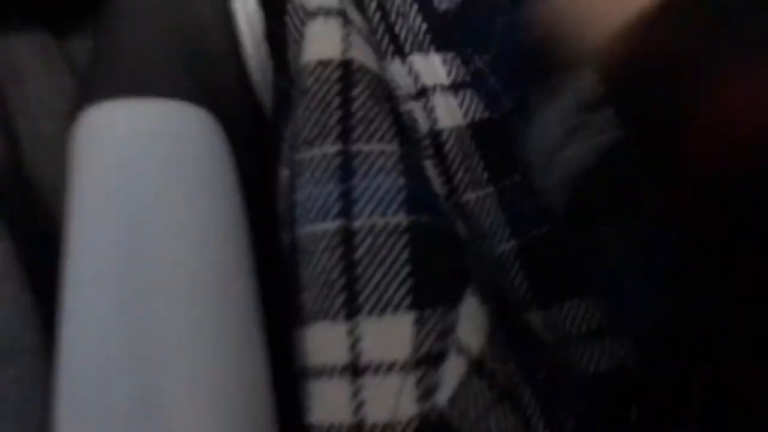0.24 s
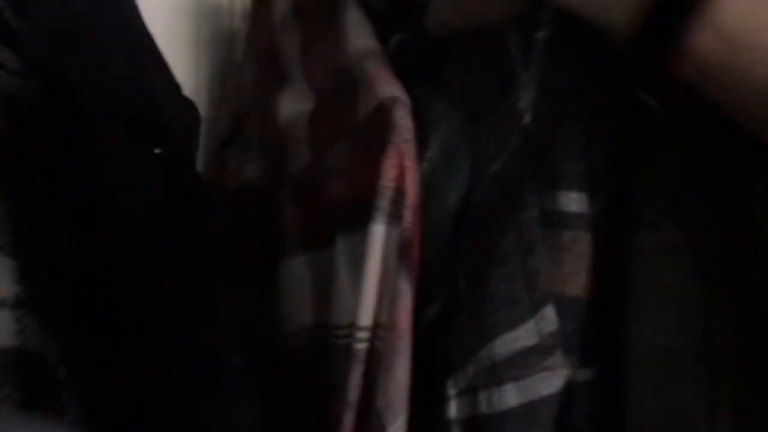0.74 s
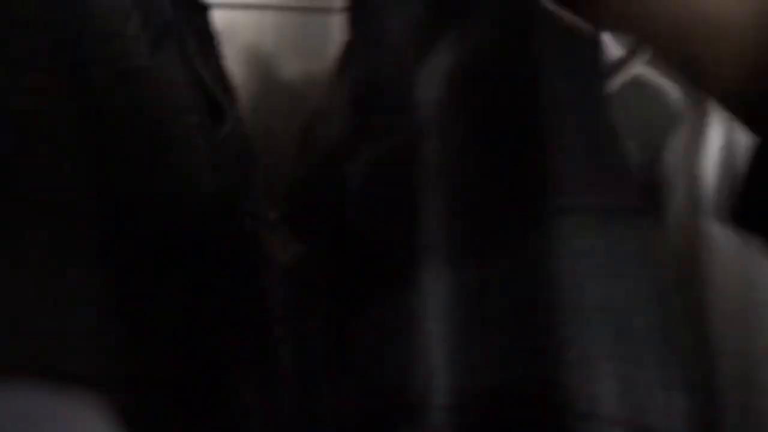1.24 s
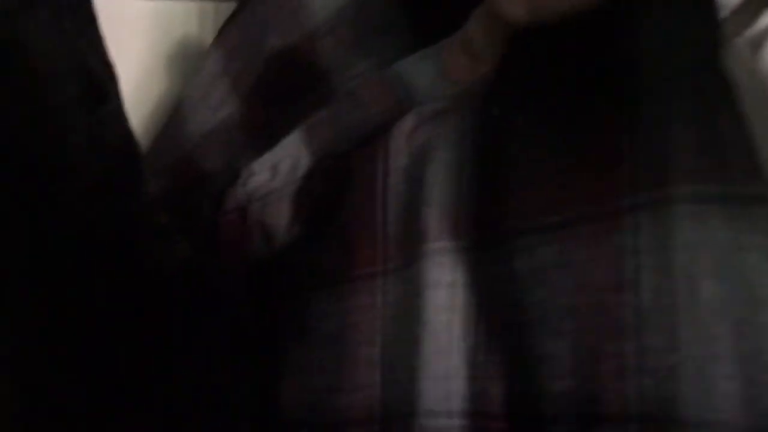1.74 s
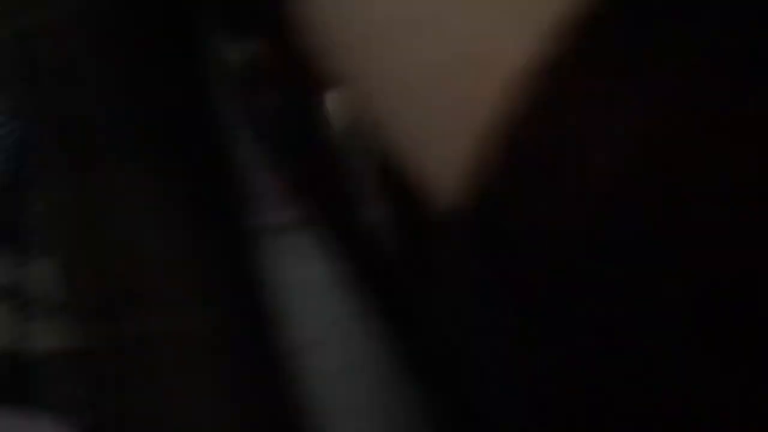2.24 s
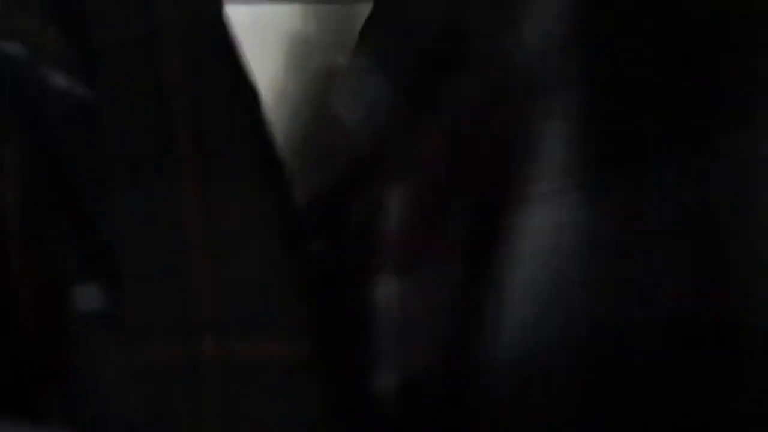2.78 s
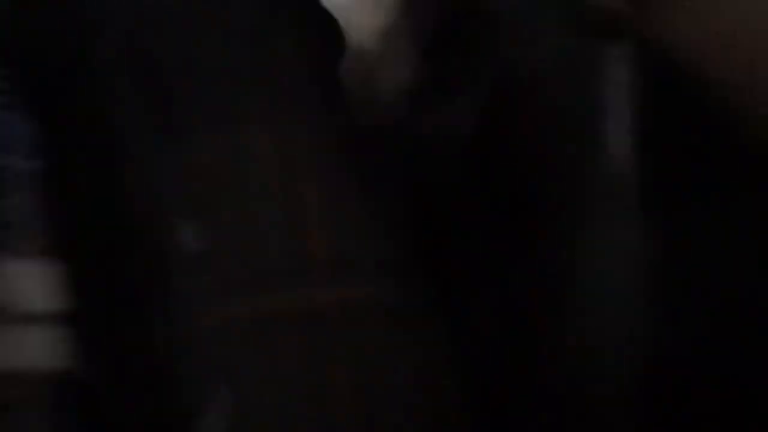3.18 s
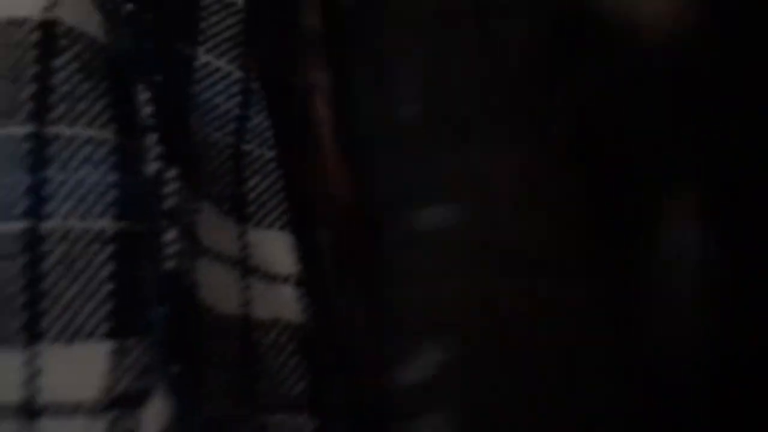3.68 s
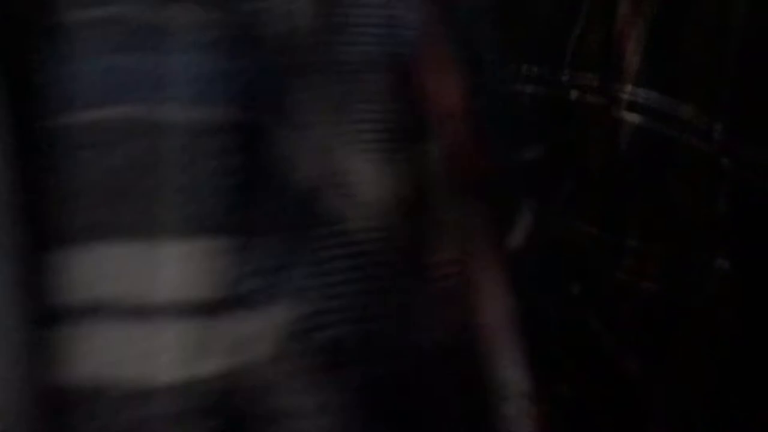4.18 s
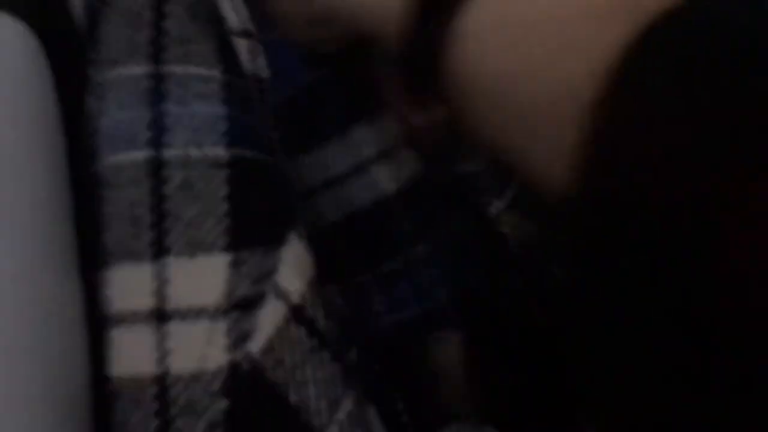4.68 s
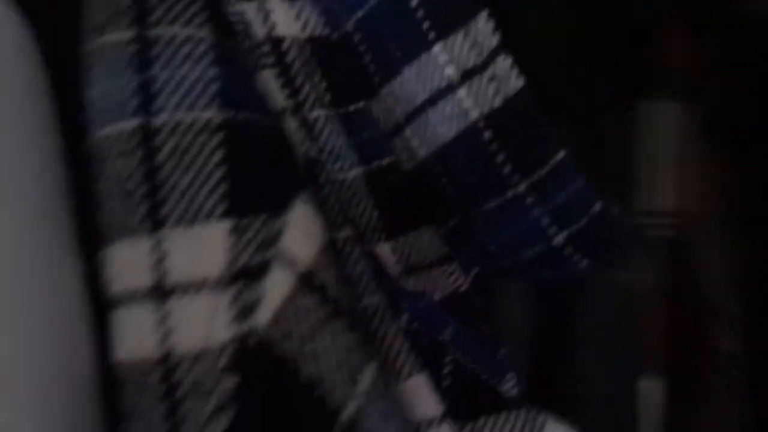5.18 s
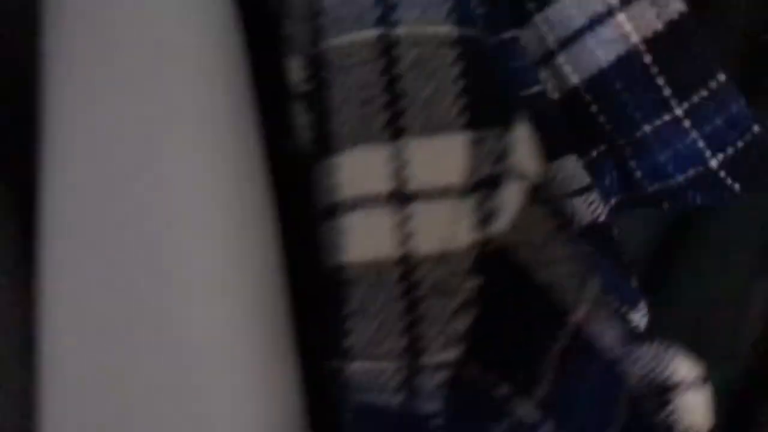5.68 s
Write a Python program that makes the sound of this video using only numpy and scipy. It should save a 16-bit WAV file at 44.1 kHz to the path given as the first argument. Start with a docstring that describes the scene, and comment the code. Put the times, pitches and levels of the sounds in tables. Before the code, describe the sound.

Shirts are pushed along a closet rail, heard up close. Each push is a brief, gritty, ringing metal scrape of hanger hooks, often with sharp clicks. The first comes at about 0.2 seconds and another at 0.9, each with a bright click. A softer slide and a light wooden knock follow around 1.4. After a lull, hooks scrape and tick at 2.1. The loudest clatter comes at 2.7, ending in a knock of a hanger on wood. Another sharp clack and a lighter knock land near 3.8. More scrapes and clicking chatters follow at 4.7, 5.2 and 5.6, with a last click near 5.9. A few very faint hanger squeaks slip in between. Throughout, the shirts rustle softly and make dull bumps and low surges of air as they swing, over quiet room rumble and microphone hiss.

```python
"""Hanger hooks scrape along a closet rail as a hand pushes shirts aside. Each hook sticks and slips,
which makes the rail ring, and hooks click against each other in short chatters. Hanger bodies knock on
the closet wood and now and then squeak. The shirts rustle, bump softly and pump the closet's air into
a low boom. Under it all lie room rumble and microphone hiss."""
import sys
import numpy as np
from scipy import signal
from scipy.fft import rfft, irfft, next_fast_len
from scipy.io import wavfile
from scipy.ndimage import uniform_filter1d, map_coordinates

SR = 44100
rng = np.random.default_rng(int(sys.argv[2]) if len(sys.argv) > 2 else 0)


def unload_audio(sound):
    """Save the sound as a 16-bit wav file, at the path given as the first command line argument."""
    columns = np.transpose(np.atleast_2d(sound))
    # keep every value between -1 and 1, then stretch to whole-number steps
    steps = np.round(np.clip(columns, -1, 1) * 32767)
    wavfile.write(sys.argv[1], SR, steps.astype(np.int16))


N = 261063

# Hanger bodies hitting wood. Each row: start in seconds, level in dB, favoured note in Hz.
WOOD_KNOCKS = [(0.16, -45, 318), (1.303, -43.5, 326), (1.412, -32.5, 369), (1.639, -51, 285),
               (2.004, -48, 288), (2.7648, -24.5, 697), (2.907, -46, 260), (3.068, -40.5, 277),
               (3.101, -44.5, 460), (3.814, -30.5, 355), (3.95, -52, 250), (3.972, -42, 250),
               (4.099, -40.5, 269), (4.425, -53, 288), (4.853, -41, 380), (4.956, -48, 250)]
# One list for each push along the rail. Each row: time in seconds, scrape level in dB, brightness in dB.
RAIL_PUSHES = [
    [(0.13, -73, -1), (0.155, -64, 5), (0.17, -47, 4.5), (0.202, -58.5, -3.5), (0.21, -48, 8.5),
     (0.23, -61, 4), (0.234, -48.5, 4), (0.3, -77, -4)],
    [(0.41, -81, 6), (0.434, -65, -1.5), (0.46, -73, -5)],
    [(0.8, -69, -1), (0.818, -57.5, -4), (0.868, -51, -1.5), (0.882, -62.5, 6), (0.892, -49, -2.5),
     (0.95, -55, -1), (0.958, -50.5, -5.5), (1.018, -58, 3), (1.045, -69, 2), (1.13, -86, 13)],
    [(1.26, -62, -1.5), (1.262, -76, -1), (1.298, -72, 8.5), (1.304, -54, -5), (1.352, -87, 12),
     (1.362, -77, 8), (1.374, -64, -0.5), (1.394, -83, 7.5), (1.4, -79, -1.5)],
    [(2.0, -68, -12.5), (2.024, -67, 6), (2.038, -51, 7), (2.102, -60, 4.5), (2.128, -54, 2),
     (2.152, -60, -2), (2.162, -47, -3), (2.176, -66, 2), (2.23, -76, 0)],
    [(2.61, -76, 5), (2.638, -49, -1), (2.653, -59, -7)],
    [(2.655, -56, -6), (2.661, -48.5, 8.5), (2.691, -43, 2.5), (2.735, -68, 4), (2.749, -48.5, 4),
     (2.755, -60, 1)],
    [(2.757, -61, 8), (2.765, -48.5, -2), (2.787, -62, -0.5), (2.843, -75, -0.5), (2.853, -55, -26),
     (2.87, -90, -3)],
    [(3.06, -103, 4), (3.068, -78, -7), (3.074, -54.5, -14.5), (3.086, -79, -10), (3.114, -76, 10),
     (3.124, -90.5, 16.5), (3.15, -88, 12)],
    [(3.63, -82, 1), (3.656, -63.5, -2), (3.664, -60.5, 2.5), (3.708, -51.5, 6), (3.76, -54.5, 10),
     (3.79, -74, 0)],
    [(3.795, -64, 5), (3.801, -60, -4), (3.817, -53, -1.5), (3.831, -59, -1.5), (3.837, -68, 6),
     (3.867, -64.5, 2.5), (3.877, -73, 3.5), (3.89, -73, 1)],
    [(3.95, -78, -6), (3.962, -90, -3), (3.972, -61, -7), (3.982, -83, 16), (4.05, -71.5, 0.5),
     (4.074, -52, -6), (4.132, -86.5, 13), (4.19, -74.5, 6)],
    [(4.41, -90.5, -5), (4.418, -85, -10), (4.422, -70, 7), (4.426, -52, -23), (4.434, -66.5, -5),
     (4.46, -56.5, -17.5), (4.47, -70.5, -6.5)],
    [(4.67, -63, -1.5), (4.68, -89.5, -7), (4.69, -67, 4), (4.708, -48, -3.5), (4.77, -54, -2),
     (4.774, -52, -9), (4.812, -64, -6), (4.818, -55.5, -10), (4.88, -73, -4)],
    [(5.11, -71, -6), (5.13, -66.5, 0.5), (5.166, -48, -1.5), (5.212, -59.5, -1.5), (5.218, -50, -4),
     (5.268, -49.5, -0.5), (5.29, -72.5, 8), (5.34, -82, 3)],
    [(5.57, -68, -17), (5.582, -67, 1), (5.596, -47.5, 0.5), (5.658, -58, -4), (5.68, -95, -7),
     (5.69, -102, 2)],
    [(5.86, -70, 3), (5.884, -74, -1), (5.894, -58, -6), (5.92, -62, -5)],
]


def amp(db):
    """Turn decibels into a gain."""
    return 10 ** (np.asarray(db) / 20)


def unit(x):
    """Scale a signal to an average (rms) size of 1."""
    return x / np.sqrt(np.mean(x ** 2) + 1e-20)


def shape(points):
    """A tone colour: gain for any pitch, drawn through (Hz, dB) points."""
    point_hz, db = np.transpose(points)
    return lambda hz: amp(np.interp(np.log(hz + 1), np.log(point_hz + 1), db))


def modes(table, hz):
    """The joint response of resonances, each given as pitch in Hz, width in Hz, level in dB."""
    return sum((-1) ** k * amp(db) * 1j * hz * width / (pitch * pitch - hz * hz + 1j * hz * width)
               for k, (pitch, width, db) in enumerate(table))


def curves(rows):
    """Join timed rows with lines: one curve for each column after the time."""
    times, *columns = np.transpose(rows)
    return [np.interp(np.arange(N) / SR, times, column) for column in columns]


def wobble(rate):
    """A smooth random curve through `rate` points a second."""
    return map_coordinates(rng.standard_normal(int(N * rate / SR) + 4), [np.arange(N) * rate / SR])


def smooth(x, seconds):
    """Make x lag behind and die away."""
    fade = np.exp(-1 / (seconds * SR))
    return signal.lfilter([1 - fade], [1, -fade], x)


def filtered(x, response):
    """Give each frequency in x the gain that `response` sets."""
    size = next_fast_len(len(x) + 4096)
    return irfft(rfft(x, size) * response(np.fft.rfftfreq(size, 1 / SR)), size)[:len(x)]


def grit(colour, grain_db, rate, patchy_db):
    """Noise whose size jumps from grain to grain and wanders in patches of pitch and time."""
    frames = signal.stft(rng.standard_normal(N) * amp(grain_db * wobble(rate)), nperseg=256)[2]
    patches = uniform_filter1d(uniform_filter1d(rng.standard_normal(frames.shape), 4, 0), 5, 1)
    noise = signal.istft(frames * amp(patchy_db * unit(patches)), nperseg=256)[1][:N]
    return unit(filtered(noise, colour))


def room_hiss():
    """Steady room rumble and microphone hiss, with a thin fuzzy whine in the treble."""
    # Each row: pitch in Hz, relative level in dB.
    hiss_colour = [(15, -21), (25, -2), (70, -2), (108, -8.5), (200, -14), (344, -9), (427, -16.5),
                   (641, -17.5), (2000, -32), (3520, -25), (5000, -33.5), (8590, -34), (10400, -46),
                   (12200, -35), (16000, -42)]
    whine = grit(lambda hz: np.exp(-((hz - 12400) / 90) ** 2), 2.5, 30, .1)
    return amp(-67.5) * grit(shape(hiss_colour), 0.092, 36, 0.48) + amp(-88) * whine


def cloth_rustle():
    """Shirts brush one another: a soft swish and a finer hiss of fibres, louder when hooks drag them."""
    # Each row: time in seconds, swish level in dB, fibre level in dB.
    rustle_levels = [(0.0, -68.5, -77), (0.3, -61, -74), (0.4, -64, -89), (0.53, -67, -86),
                     (0.77, -69, -71), (0.97, -63, -55), (1.12, -67, -71), (1.63, -73.5, -89),
                     (1.88, -75, -72), (2.09, -64, -69.5), (2.28, -72.5, -81), (2.57, -71, -72.5),
                     (2.78, -73, -79.5), (2.92, -71, -76), (3.1, -70, -75), (3.32, -68.5, -72),
                     (3.5, -69, -63.5), (3.58, -70, -66), (3.66, -64, -64.5), (3.87, -69, -79),
                     (4.14, -68, -75.5), (4.47, -72, -71.5), (4.76, -67, -74), (4.95, -68, -83.5),
                     (5.38, -71, -78), (5.56, -68.5, -68.5), (5.8, -68.5, -77), (5.92, -62.5, -59.5)]
    # The two tone colours. Each row: pitch in Hz, relative level in dB.
    swish_colour = [(200, -20.5), (500, -5), (1500, -8), (4000, -15.5), (8000, -19)]
    fibre_colour = [(2350, -38.5), (4000, -6), (7440, -5), (8550, -4.5), (9440, -7), (13800, -3),
                    (16000, -7)]
    swish_db, fibre_db = curves(rustle_levels)
    drag = smooth(push_curves()[0], seconds=0.011)
    swish_level = amp(swish_db) + amp(-14) * drag
    fibre_level = amp(fibre_db + 0.3 * wobble(4.9)) + amp(-19) * drag
    rub = amp(1.6 * wobble(18))
    swish = grit(shape(swish_colour), grain_db=.6, rate=400, patchy_db=2.8)
    fibres = grit(shape(fibre_colour), grain_db=1.3, rate=1200, patchy_db=1.5)
    return rub * (swish_level * swish + fibre_level * fibres)


def clothes_swings():
    """A level curve: each swing of the clothes swells and sinks as one rounded hump."""
    # Each row: start in seconds, length in seconds, level in dB.
    swings = [(0.179, 0.11, -43), (0.251, 0.064, -44.5), (0.459, 0.04, -59), (0.552, 0.044, -55.5),
              (0.658, 0.023, -52), (0.86, 0.065, -54), (0.919, 0.18, -46), (1.172, 0.043, -52.5),
              (1.224, 0.079, -60), (1.292, 0.11, -48.5), (1.408, 0.04, -41), (1.596, 0.026, -60),
              (2.043, 0.04, -49.5), (2.074, 0.061, -51), (2.114, 0.055, -41.5), (2.201, 0.034, -53.5),
              (2.295, 0.027, -60), (2.349, 0.018, -56.5), (2.567, 0.037, -57), (2.684, 0.068, -36),
              (2.753, 0.077, -35), (2.9, 0.026, -54), (2.96, 0.13, -62.5), (3.092, 0.077, -48.5),
              (3.64, 0.062, -50.5), (3.727, 0.081, -41), (3.801, 0.091, -40), (3.958, 0.088, -47),
              (4.174, 0.017, -58), (4.256, 0.021, -54), (4.686, 0.07, -45), (4.735, 0.092, -39),
              (4.818, 0.073, -49.5), (4.973, 0.02, -63.5), (5.056, 0.16, -58.5), (5.252, 0.066, -45.5),
              (5.583, 0.097, -43.5), (5.638, 0.098, -47.5), (5.856, 0.12, -54.5)]
    t, rise_share = np.arange(N) / SR, 0.33
    out = np.zeros(N)
    for start, length, db in swings:
        ramp = np.interp(t, [start, start + rise_share * length, start + length], [0, 1, 0])
        out += amp(db) * np.sin(np.pi / 2 * ramp) ** 2
    return out


def closet_boom():
    """Moving clothes pump the closet's air in low surges."""
    # Each row: pitch in Hz, relative level in dB.
    air_colour = [(22, -39.5), (38, 0), (62, 1.5), (105, -1.5), (145, -4), (200, -15), (300, -11),
                  (400, -51.5)]
    # The restless air under the swings. Each row: time in seconds, level in dB.
    air_levels = [(0.0, -60.5), (0.33, -58), (0.74, -61.5), (1.12, -59), (1.78, -64), (2.04, -64),
                  (2.18, -55), (2.52, -67), (2.87, -54), (3.46, -63), (3.68, -72), (3.89, -47.5),
                  (4.42, -65.5), (4.96, -57), (5.46, -65.5), (5.92, -56)]
    air = grit(shape(air_colour), 1.2, 35, 0.4)
    loudness = np.abs(signal.hilbert(air, next_fast_len(N))[:N])
    air = unit(air / (loudness + 0.28) ** .6)  # partly even out the noise's own swells
    swell = amp(curves(air_levels)[0] + 2.8 * wobble(9.1)) + clothes_swings()
    return filtered(swell * air, lambda hz: hz ** 4 / (hz ** 4 + 22.0 ** 4) / (1 + (hz / 400) ** 6))


def push_curves():
    """Scrape gain and brightness in dB over time; silent between pushes."""
    t = np.arange(N) / SR
    scrape, bright_db = np.zeros(N), np.zeros(N)
    for times, db, bright in map(np.transpose, RAIL_PUSHES):
        scrape += amp(np.interp(t, times, db, -200, -200))
        bright_db += np.interp(t, times, bright, 0, 0)
    return scrape, bright_db


def rail_ring(table, scratch):
    """The rail's resonances drift in pitch and come and go as the contact point moves."""
    drift_share, flicker_db = 0.045, 4
    hz, _, frames = signal.stft(scratch, SR, nperseg=1024, noverlap=768)
    chance = uniform_filter1d(rng.standard_normal((len(table), 2, frames.shape[1])), size=3, axis=2)
    chance /= chance.std()
    moving = [(pitch * (1 + drift_share * drift), width, db + flicker_db * flicker)
              for (pitch, width, db), (drift, flicker) in zip(table, chance)]
    gain = modes(moving, hz[:, None])
    gain /= np.linalg.norm(gain, axis=0)  # the scrape keeps its strength while its colour shifts
    return unit(signal.istft(frames * gain, SR, nperseg=1024, noverlap=768)[1][:N])


def hook_notes(scratch):
    """The hooks of each push ring at a note of their own."""
    # One row for each push: pitch in Hz, level against the scrape in dB.
    notes = [(3400, -9), (3350, -1), (3620, -10.5), (2460, -15), (2480, -10), (2283, -1.5), (2600, 0),
             (2430, -8.5), (2280, -4), (1570, 2.5), (2340, -0.5), (2280, -10.5), (2400, -11.5),
             (2370, -7.5), (2760, -8), (2550, -20), (2600, -12)]
    out, width_hz = np.zeros(N), 550
    for push, (pitch, db) in zip(RAIL_PUSHES, notes):
        span = slice(round(push[0][0] * SR), round(push[-1][0] * SR) + 400)
        ring = filtered(scratch[span], lambda hz: modes([(pitch, width_hz, 0)], hz) ** 2)
        out[span] = amp(db) * unit(ring)
    return out


def hook_scrapes():
    """Hooks stick and slip: tiny jolts ring the rail, make the wire sizzle and shake the hanger."""
    # Resonances of the rail and the rubbed wire. Each row: pitch in Hz, width in Hz, relative level in dB.
    rail_modes = [(856, 100, -3), (1178, 270, -2), (1570, 110, 0), (1870, 100, -4.5), (2450, 90, -8.5),
                  (2690, 93, -1.5), (3300, 190, -0.5), (4180, 140, -2), (4900, 200, -8), (5610, 240, -4),
                  (6540, 300, -5.5)]
    wire_modes = [(6145, 2500, -8.5), (8300, 550, 1), (11000, 2800, 0.5), (12500, 2300, -2.5),
                  (15200, 2000, -7)]
    scrape, bright_db = push_curves()
    jolts = unit((rng.random(N) < 800 / SR) * rng.standard_normal(N))  # about 800 a second
    scratch = lambda: 0.74 * jolts + rng.standard_normal(N) * amp(3.5 * wobble(300))
    low = rail_ring(rail_modes[:4], scratch()) + hook_notes(0.74 * jolts + rng.standard_normal(N))
    high = rail_ring(rail_modes[4:], scratch())
    stutter = amp(1.3 * wobble(70))
    body = hanger_shake(scrape)
    wire = lambda hz: modes(wire_modes, hz)
    sizzle = unit(.45 * unit(filtered(jolts, wire)) + grit(wire, 2.5, 500, 3.3))
    layers = [(low, 0), (high, bright_db - 0.5), (sizzle, 1.6 * bright_db - 5)]
    return stutter * sum(sound * smooth(scrape * amp(db), seconds=0.0013) for sound, db in layers) + body


def hanger_shake(scrape):
    """Hanger bodies shake with each scrape and swing, and go on shaking after a knock."""
    # Each row: pitch in Hz, relative level in dB.
    body_colour = [(88, -26.5), (150, 4.5), (445, -4), (609, -3), (737, -8), (1200, -18.5), (1560, -41.5),
                   (2640, -120)]
    t, fade_s = np.arange(N) / SR, 0.22
    knocked = sum((t >= start) * amp(db - 17 - 60 * np.abs(t - start) / fade_s)
                  for start, db, _ in WOOD_KNOCKS)
    shaking = amp(-2) * scrape + knocked + amp(-20) * clothes_swings()
    return grit(shape(body_colour), 1.0, 180, 2.3) * smooth(shaking, seconds=0.0013)


def wood_knocks():
    """A padded blow rings the wood, most of all near the struck spot's note, and the closet booms once."""
    # Each row: pitch in Hz, relative level in dB, ring time as a multiple of ring_s.
    wood_modes = [(364, 10, 0.75), (507, -3, 1.8), (582, -6, 2.2), (681, 5.5, 0.77), (1096, -19.5, .4),
                  (1738, -7.5, 0.31), (259.8, -0.5, 2.2)]
    ring_s = 0.064  # time to fade by 60 dB
    out, t = np.zeros(N + SR), np.arange(SR // 3) / SR
    boom = np.sin(2 * np.pi * 85 * t) * amp(-60 * t / 0.1) * (1 - np.exp(-t / 0.0073))
    for start, db, spot_hz in WOOD_KNOCKS:
        ring = np.zeros(len(t))
        for pitch, level, multiple in wood_modes:
            mode_db = level - 9.3 * abs(np.log2(pitch / spot_hz)) + rng.normal(0, 0.58)
            tone = np.sin(2 * np.pi * pitch * rng.normal(1, 0.004) * t)
            ring += amp(mode_db - 60 * t / (ring_s * multiple)) * tone
        ring *= 1 - np.exp(-t / 0.00046)
        noise = unit(filtered(rng.standard_normal(len(t)), lambda hz: modes([(1180, 900, 0)], hz)))
        crisp_edge = amp(-15.5 - 60 * t / 0.011) * noise
        knock = ring / np.abs(ring).max() + amp(-16) * boom + crisp_edge
        out[round(start * SR):][:len(t)] += amp(db) * knock
    return out[:N]


def hook_clicks():
    """Hook hits hook: a sharp blow, two quick rebounds and a short, brighter tail among the clothes."""
    # Each row: start in seconds, peak in dB, then tone settings in dB near 4 kHz and near 13 kHz.
    hits = [(0.1671, -24.5, 5, -18), (0.2352, -3, -14, -0.5), (0.8614, -3.5, -17.5, -3),
            (0.8717, -21, -6, -9), (0.8953, -34, 7, -6), (0.914, -15.5, -6, -3), (1.035, -19, -2, 1),
            (1.292, -39, -7, 0), (1.312, -34.5, -3, -7), (1.3596, -38, 1, -11), (1.3706, -36.5, 11, -10),
            (2.026, -23, 7, 6), (2.0712, -14, -4, 9.5), (2.125, -33, 11, -5), (2.138, -22.5, -6, -2),
            (2.1597, -18, 5, -2), (2.656, -30, -8, 2), (2.6787, 1.5, -6, 3.5), (2.6817, 0, -25, 4.5),
            (2.6883, 2.5, -7, 4.5), (2.696, -11, -9, 5), (2.703, -19, -12, 2), (2.721, -16.5, -8, 1),
            (2.725, -30, 7, -5), (2.7392, -20.5, 2, 1), (2.7475, -20.5, 3, 4), (2.7622, -28, -11, -1),
            (2.961, -48.5, -5, -10), (3.068, -40.5, 10, -18), (3.103, -50, 9, 7.5), (3.7427, -2, -9.5, 5),
            (3.748, -2.5, -10, 4), (3.7697, -36, -2, -3), (3.7984, -32, -1, 0), (3.803, -21.5, -2, 6),
            (3.817, -36, -13, -10), (3.848, -38, 12, -10), (3.883, -45, 9, -12), (4.014, -48, 16, 3),
            (4.062, -41, 11, -7), (4.099, -39, 8, -1), (4.2594, -51, 16, -6), (4.4252, -51.5, 5.5, 18),
            (4.6602, -19.5, -2.5, 3), (4.7, -27.5, 8, -7), (4.7087, -9.5, -5, 4), (4.769, -26, -3, 2),
            (4.7748, -13, -2.5, 6.5), (4.812, -34, -4, -3), (4.819, -11.5, -1.5, 7.5),
            (4.8844, -31, 1.5, -32), (4.908, -46.5, 11, -16), (4.934, -51, 9, -21), (4.981, -42.5, 11, -16),
            (5.2173, -10, -11, -11.5), (5.2619, -3, -9, -4.5), (5.269, -17, -10, -6.5),
            (5.5941, -14.5, -3.5, 3.5), (5.6935, -43.5, 2, -7), (5.8919, -14, -4.5, 2)]
    # Resonances of a wire hook. Each row: pitch in Hz, width in Hz, relative level in dB.
    hook_modes = [(3780, 210, -3.5), (8720, 590, 3.5), (9450, 330, -4.5), (12810, 550, 4),
                  (13700, 890, -12)]
    out, lead, size, rise_s = np.zeros(N + SR), 200, 6000, .0004
    t = (np.arange(size) - lead) / SR
    fade = lambda delay, fade_s: (t >= delay) * amp(-60 * np.abs(t - delay) / fade_s)
    shine = lambda hz: 1j * hz / (6000 + 1j * hz)  # cloth and wood swallow the lower part of the tail
    for (start, db, mid_db, top_db), chance in zip(hits, rng.random((len(hits), 7))):
        # The weaker the click, the larger the share of its rebounds and tail.
        rebound_db = -3 - 0.86 * db + 3 * (2 * chance[2] - 1)
        tail_db = -20.5 - 0.6 * db
        crunch, blows = fade(0, 0.0018), np.zeros(size)
        blows[lead + round(rise_s * SR)] = 1
        delays = rise_s + np.cumsum(.0008 + .0007 * chance[:2])
        for delay, loss_db in zip(delays, np.cumsum(5 + 4 * chance[3:5])):
            crunch += amp(rebound_db - loss_db) * fade(delay, 0.00069)
            blows[lead + round(delay * SR)] = amp(rebound_db - loss_db)
        crunch *= amp(rng.normal(-3, 3.2, size))  # the rough part of the contact
        force = (3 * blows + crunch) * rng.choice([-1, 1], size)
        tail = amp(tail_db) * (fade(0, 0.049) + amp(-18.5) * fade(0, 0.26)) * rng.standard_normal(size)
        low_db = 2 * mid_db - 9
        tone = shape([(400, low_db - 23.5), (2000, low_db), (4200, mid_db), (8300, 0), (13000, top_db)])
        detune = 1 + .1 * (chance[6] - .5)
        colour = lambda hz: tone(hz) * (.5 + modes(hook_modes, hz * detune))
        click = filtered(force + filtered(tail, shine), colour)
        out[round(start * SR) - lead:][:size] += amp(db) * click / np.abs(click).max()
    return out[:N]


def garment_bumps():
    """Clothes bump softly: a low, dull thump that dies away within about two cycles."""
    # Each row: start in seconds, peak in dB, pitch in Hz.
    bumps = [(1.187, -45.5, 74.6), (2.128, -33, 96), (2.302, -43.5, 70), (2.358, -42.5, 69),
             (2.698, -32, 79), (3.119, -39, 112), (3.742, -33, 69.6), (3.988, -39, 75.8),
             (4.012, -39, 69.3), (5.668, -41, 64.6)]
    out, t = np.zeros(N + SR), np.arange(SR // 8) / SR
    for start, db, hz in bumps:
        cycles = hz * t
        thump = -np.sin(2 * np.pi * cycles) * cycles * amp(-20 * cycles)
        out[round(start * SR):][:len(t)] += amp(db) * thump / np.abs(thump).max()
    return out[:N]


def hanger_squeaks():
    """A swaying hanger briefly sings on one note: the hook thin and high, the body low and hollow."""
    # Each row: start in seconds, length in seconds, pitch in Hz, level in dB.
    squeaks = [(1.728, .03, 10240, -81), (1.804, 0.013, 10200, -76), (1.863, 0.0088, 10300, -77.5),
               (2.611, 0.019, 9970, -66.5), (2.924, 0.017, 10200, -75), (4.723, 0.029, 599, -45)]
    out, t = np.zeros(N), np.arange(N) / SR
    waver = 0.72 * wobble(90)
    for start, length, hz, db in squeaks:
        swell = np.exp(-(2 * (t - start) / length - 1) ** 4)
        out += amp(db) * swell * np.sqrt(2) * np.sin(2 * np.pi * hz * t + waver)
    return out


def scene():
    """All the sounds added into one channel."""
    return (hook_clicks() + wood_knocks() + garment_bumps() + hook_scrapes() + hanger_squeaks()
            + cloth_rustle() + closet_boom() + room_hiss())[None]


def record(dry):
    """The microphone rounds off the hardest peaks and loses the lowest bass and highest treble."""
    ceiling, low_hz, top_hz = .72, 28, 16000
    rounded = dry[0] / (1 + np.abs(dry[0] / ceiling) ** 4) ** (1 / 4)
    band = lambda hz: (1j * hz / (low_hz + 1j * hz)) ** 2 / (1 + (hz / top_hz) ** 200)
    return filtered(rounded, band)[None]


dry = scene()
out = record(dry)
unload_audio(out)
```